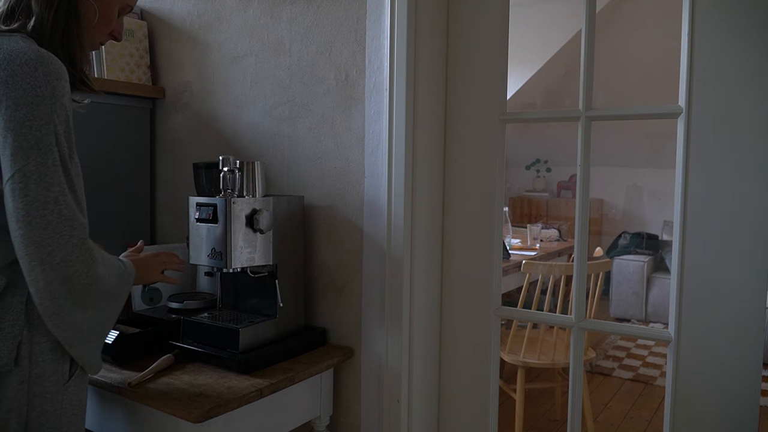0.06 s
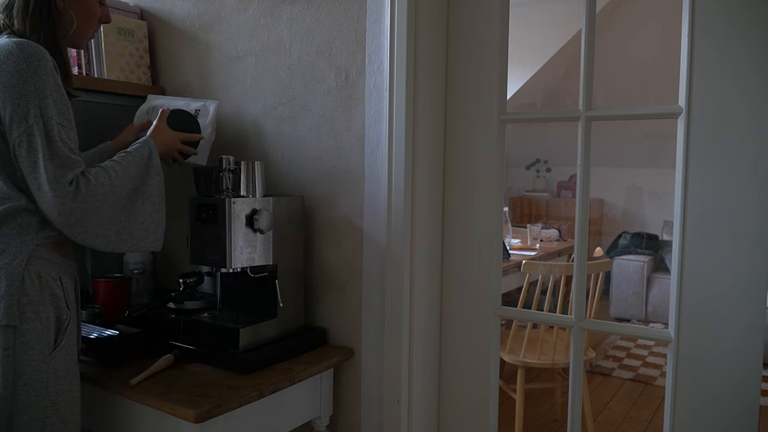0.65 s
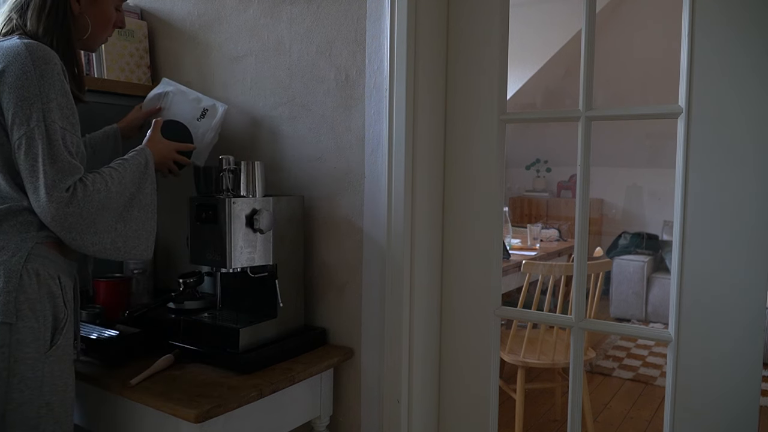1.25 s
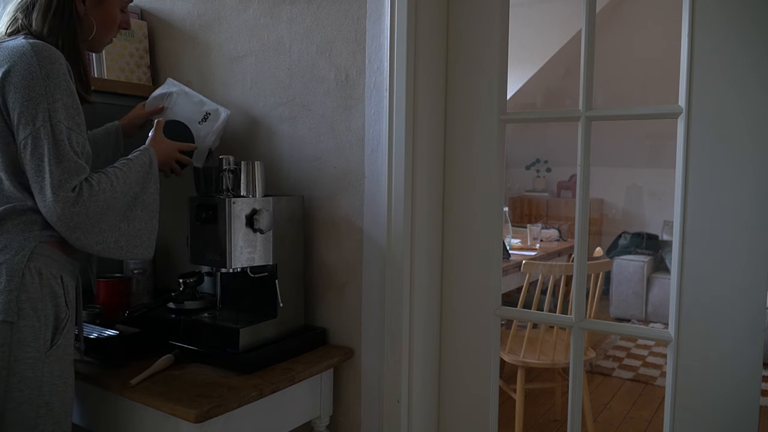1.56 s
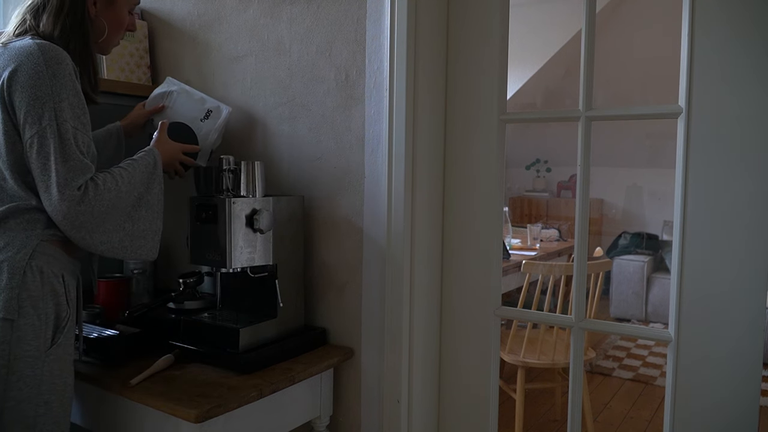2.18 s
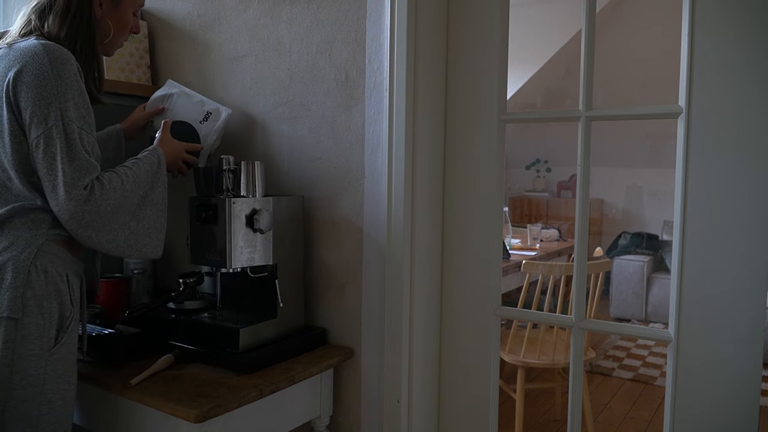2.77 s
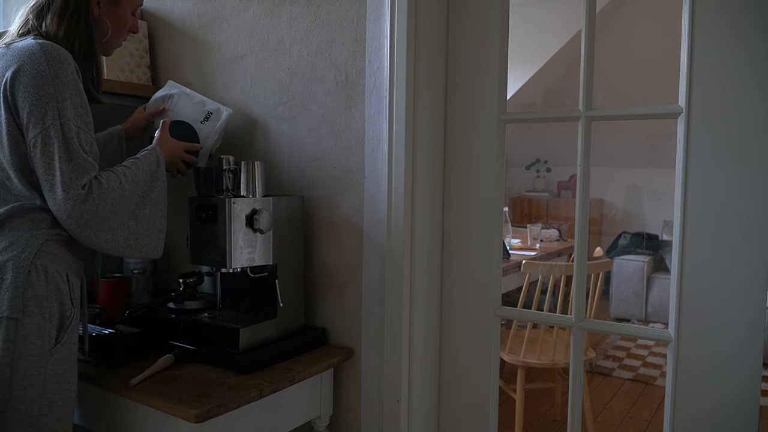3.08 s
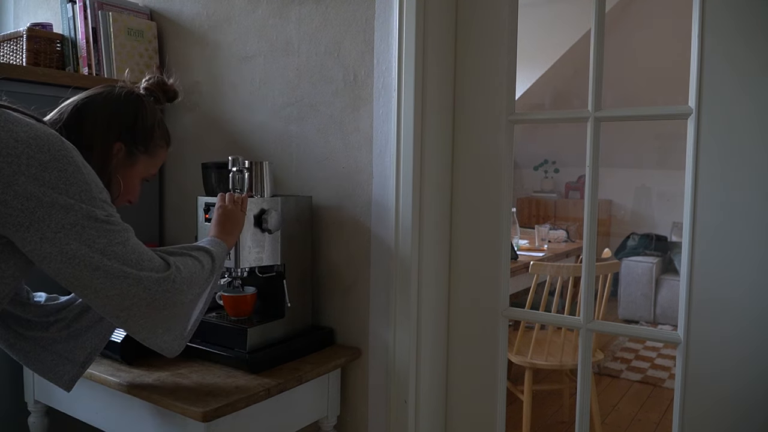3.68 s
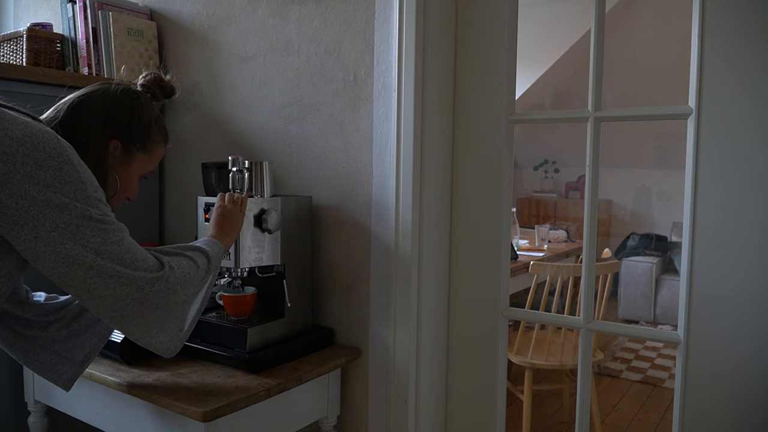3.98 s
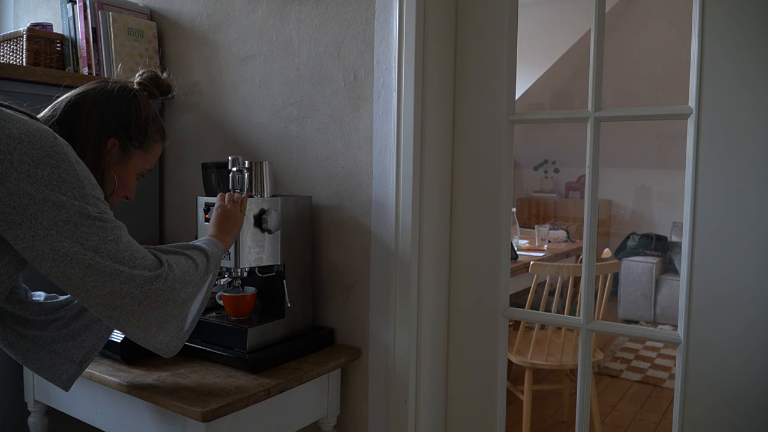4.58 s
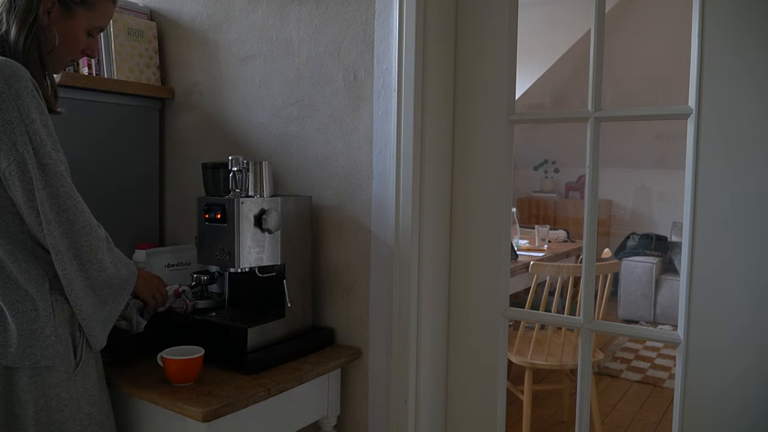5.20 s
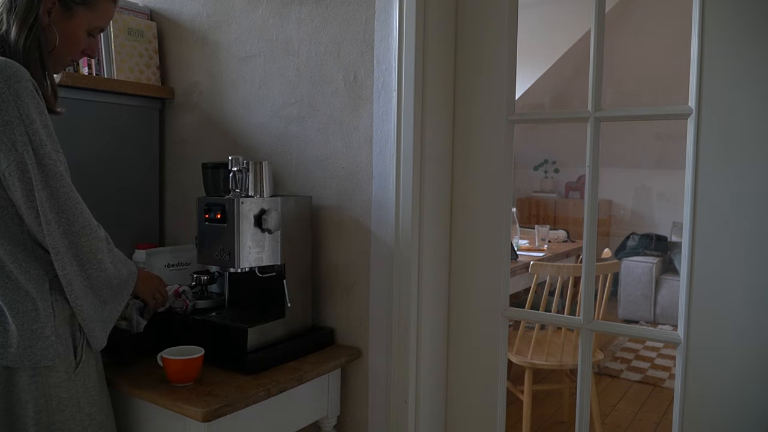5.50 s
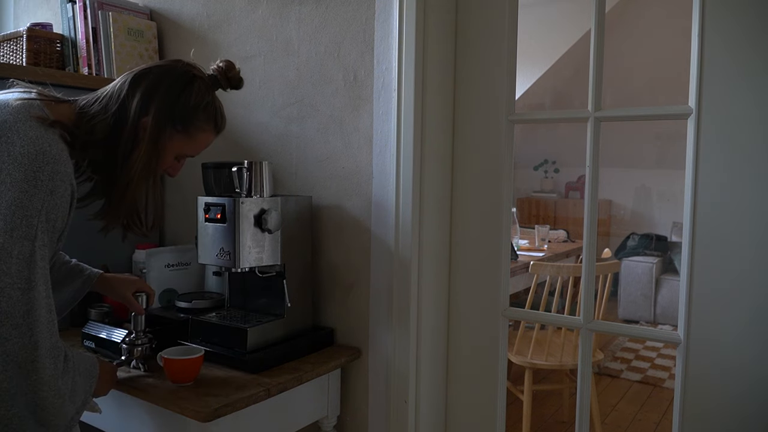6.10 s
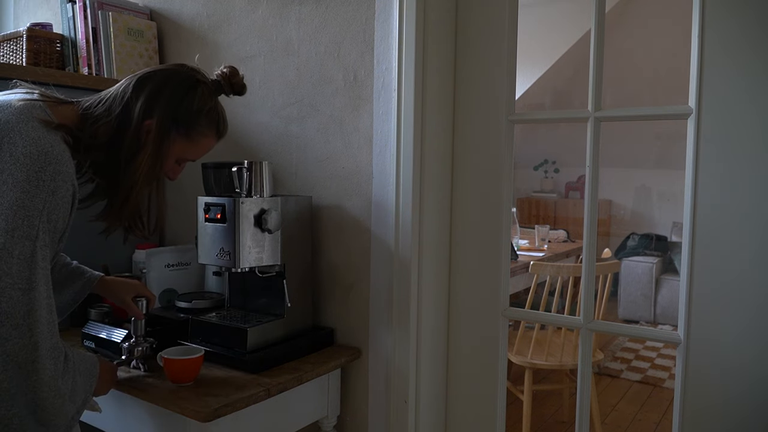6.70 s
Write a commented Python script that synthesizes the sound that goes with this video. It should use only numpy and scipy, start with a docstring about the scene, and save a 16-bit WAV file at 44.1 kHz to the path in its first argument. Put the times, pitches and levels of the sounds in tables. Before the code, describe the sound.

A paper bag crinkles and beans clatter into a hopper, followed by an espresso pump's buzzing hum and a short burst of grinding.

```python
"""A rattle of beans dies away in a ringing metal cup; a paper bag rustles and crinkles; beans pour, clicking on
each other and pinging off a plastic hopper. An espresso machine's piston pump hums at the mains rate, then its
grinder crushes beans with a loud rush and a gear whine until the scene changes. A faint metallic hiss and soft
knocks remain. Short scenes in a small kitchen, cut into one another."""
import sys
import numpy as np
from scipy import signal
from scipy.fft import rfft, irfft
from scipy.io import wavfile
from scipy.ndimage import uniform_filter1d

SR = 44100
rng = np.random.default_rng(int(sys.argv[2]) if len(sys.argv) > 2 else 0)


def transcribe(u):
    """Save the signal u as a 16-bit wav file named by the first command-line argument.

    u: samples, shape (n,) or (channels, n), limited to [-1, 1]; the rate is SR.
    q: integer samples, one column per channel.
    """
    v = np.clip(np.atleast_2d(u).T, -1, 1)
    q = np.round(v * 32767).astype(np.int16)
    wavfile.write(sys.argv[1], SR, q)


N = 302085
T = np.arange(N) / SR
HZ = np.fft.rfftfreq(8192, 1 / SR)
PUMP_ON_S, GRINDER_ON_S, GRINDER_OFF_S = 3.331, 4.793, 5.814

# dull spectrum of paper rustle and faint air: f/Hz, level/dB
RUSTLE_COLOUR = [(40, -44), (150, -33.5), (235, -15.5), (340, -14.5), (520, -2.5), (1100, 0.5), (1700, -2),
                 (4000, -8), (6000, -15), (16000, -22)]
# bright spectrum of crinkling paper and cracking shells: f/Hz, level/dB
CRACKLE_COLOUR = [(2000, -36.5), (4500, -2.5), (7000, 2), (10000, 2), (13000, 6), (16000, -1.5)]


def amp(db):
    """Decibels to gain."""
    return 10 ** (np.asarray(db) / 20)


def unit_rms(x):
    """Scale to rms 1."""
    return x / np.sqrt(np.mean(x ** 2) + 1e-20)


def log_interp(points, hz):
    """Interpolate a table over log frequency."""
    f, value = np.transpose(points)
    return np.interp(np.log(hz + 1), np.log(f + 1), value)


def gate(t, at_s, edge_s=.004):
    """Ramp from 0 to 1, centred on at_s."""
    return np.clip((t - at_s) / edge_s + .5, 0, 1)


def swell(age, rise_s, hold_s, fade_db_per_s):
    """Attack, hold, release."""
    return np.clip(age / rise_s, 0, 1) * amp(-fade_db_per_s * np.maximum(age - rise_s - hold_s, 0))


def span(start_s, end_s):
    """Sample times of one scene."""
    return T[round(start_s * SR):round(end_s * SR)]


def highpass(x, edge_hz):
    """Small light things radiate no bass."""
    return signal.sosfilt(signal.butter(4, edge_hz, "high", fs=SR, output="sos"), x)


def add(mix, at_s, sound):
    """Mix a sound in at at_s."""
    part = mix[max(round(at_s * SR), 0):][:len(sound)]
    part += sound[:len(part)]


def body(colour, peaks=()):
    """Minimum-phase impulse response of a smooth spectrum plus resonances."""
    power = amp(log_interp(colour, HZ)) ** 2
    for hz, width_hz, db in peaks:
        power = power + amp(db) ** 2 / (1 + ((HZ - hz) / width_hz) ** 2) ** 2
    log_gain = np.log(np.r_[power, power[-2:0:-1]] + 1e-12) / 2
    return np.fft.ifft(np.exp(np.conj(signal.hilbert(log_gain)))).real[:len(HZ)]


def excite(x, response):
    """Circular convolution, scaled to rms 1."""
    return unit_rms(irfft(rfft(x) * rfft(response, len(x)), len(x)))


def ring(modes, scatter_db=3, detune=0.0045):
    """Decaying modes; each blow lands on a new spot, so level and pitch scatter."""
    t = T[:SR // 6]
    sound = np.zeros(len(t))
    for hz, width_hz, db in modes:
        decay = amp(db + scatter_db * rng.normal()) * np.exp(-np.pi * width_hz * t)
        struck_hz = hz * (1 + detune * rng.normal())
        sound += decay * np.sin(2 * np.pi * (struck_hz * t + rng.random()))
    return sound


def grains(t, per_s, spread_db):
    """Random clicks: many small, a few large."""
    hit = rng.random(len(t)) < per_s / SR
    size = np.minimum(rng.exponential(1, len(t)), 4)
    return hit * rng.choice([-1, 1], len(t)) * amp(spread_db * size)


def wander(t, rate_hz):
    """Random drift of rms 1, low-passed at rate_hz."""
    coarse = t[::64]
    f = np.fft.rfftfreq(len(coarse), coarse[1] - coarse[0])
    spectrum = rfft(rng.standard_normal(len(coarse))) / (1 + (f / rate_hz) ** 2) ** 2
    return unit_rms(np.interp(t, coarse, irfft(spectrum, len(coarse))))


def reflections():
    """Sparse echoes of energy 1; the treble dies first."""
    # room decay: f/Hz, t60/s
    decay = [(200, 0.58), (2000, 0.49), (8000, 0.05), (16000, 0.04)]
    taps = rng.choice([-1, 1], SR // 4) * (rng.random(SR // 4) < .15)
    hz, s, bands = signal.stft(taps, SR, nperseg=256)
    tail = signal.istft(bands * amp(-60 * s / log_interp(decay, hz)[:, None]), SR, nperseg=256)[1]
    return tail / np.linalg.norm(tail)


def kitchen(t, x, wet_db, side_db, left_db):
    """Direct sound and room in the middle, echoes at the sides; all cut off with the scene."""
    # side-channel spectrum: f/Hz, level/dB
    width = [(50, -22), (180, -54), (350, -27), (700, -17), (1400, -14), (2800, -8.5), (6000, -2.5),
             (14000, 3)]
    echoes = signal.fftconvolve(x, reflections())[:len(t)]
    mid = (x + amp(wet_db) * echoes) / np.sqrt(1 + amp(wet_db) ** 2)
    spot = unit_rms(np.sin(2 * wander(t, 31.6)))  # each grain sounds from a slightly different place
    side_response = signal.fftconvolve(reflections(), body(width))
    side = amp(side_db) * signal.fftconvolve(x * spot, side_response)[:len(t)]
    cut = signal.windows.tukey(len(t), .002)
    out = np.zeros((2, N))
    for channel, sign in zip(out, (1, -1)):
        add(channel, t[0], (mid + sign * side) * amp(sign * left_db / 2) * cut)
    return out


def worktop_knocks(t):
    """Something is set down softly: dull, decaying bursts."""
    # knocks: t/s, level/dB, t60/s
    knocks = [(6.315, -54, 0.76), (6.332, -50.5, 0.24), (6.47, -61, 0.97)]
    # their spectrum: f/Hz, level/dB
    colour = [(40, -26), (110, -7), (220, -9), (295, 3), (400, -5), (800, 3), (1200, -14), (3000, -23),
              (4300, -8), (5500, -26), (12000, -40)]
    envelope = sum(amp(db - 60 * np.maximum(t - s, 0) / t60) * gate(t, s) for s, db, t60 in knocks)
    return envelope * excite(grains(t, per_s=2500, spread_db=3.0), body(colour))


def idle_machine():
    """The hot machine hisses and sings faintly behind the knocks."""
    # hiss spectrum: f/Hz, level/dB
    colour = [(30, -23), (110, -12.5), (350, -8), (750, -1.5), (1400, -3), (2100, -10.5), (3300, -9),
              (4800, -5.5), (5600, -8.5), (9000, -10.5), (16000, -21)]
    # thin tones: f/Hz, level/dB
    tones = [(592, -75), (3828, -69), (4841, -72), (4866, -69), (4915, -74), (5954, -80), (8646, -80)]
    t = span(GRINDER_OFF_S, N / SR)
    sound = amp(-55) * excite(rng.standard_normal(len(t)), body(colour))
    for hz, db in tones:
        tone = np.sin(2 * np.pi * hz * t + 0.67 * wander(t, 7.2))
        sound += amp(db + 1.0) * unit_rms(tone * (1 + 0.31 * wander(t, 10)))
    return kitchen(t, sound + worktop_knocks(t), wet_db=-17.0, side_db=3.0, left_db=2.0)


def paper_bag():
    """Each move gives a dull rustle and fine crinkles that fade sooner; a few creases snap."""
    # bag lifted, tipped, shaken: t/s, rise/s, hold/s, rustle level/dB, crinkle level/dB
    moves = [(0.383, 0.11, .17, -34.5, -40), (0.692, 0.023, 0.086, -39.5, -45),
             (0.916, 0.0097, 0.0076, -39, -46.5), (1.04, .02, .02, -44, -47),
             (1.137, .025, 0.13, -38.5, -45.5), (1.264, 0.023, 0.021, -36, -36.5),
             (1.356, .03, 0.15, -35.5, -36.5), (1.714, 0.02, .01, -44.5, -31),
             (1.823, .03, 0.069, -45, -48), (2.053, .025, 0.017, -45, -52), (2.278, 0.02, .03, -46.5, -48),
             (2.39, 0.024, 0.12, -48.5, -56), (2.613, 0.021, 0.04, -49.5, -54),
             (2.774, 0.02, .02, -51, -52.5), (3.072, 0.031, 0.02, -46.5, -54)]
    # snapping creases: t/s, level/dB
    creases = [(0.9313, -31), (1.043, -29.5), (1.1603, -33), (1.264, -27), (1.2945, -29), (1.4222, -16.5)]
    rustle_db_per_s, crinkle_db_per_s = 66, 125
    t = span(.38, PUMP_ON_S)
    slide, flex = np.zeros((2, len(t)))
    for s, rise_s, hold_s, rustle_db, crinkle_db in moves:
        slide = np.maximum(slide, amp(rustle_db) * swell(t - s, rise_s, hold_s, rustle_db_per_s))
        flex = np.maximum(flex, amp(crinkle_db) * swell(t - s, rise_s, hold_s, crinkle_db_per_s))
    slide *= amp(2.0 * wander(t, 14))
    rustle = slide * excite(grains(t, per_s=6000, spread_db=2.0), body(RUSTLE_COLOUR))
    flex *= amp(2.4 * wander(t, 14))
    crinkle = flex * excite(grains(t, per_s=21000, spread_db=3.5), body(CRACKLE_COLOUR))
    age = T[:SR // 40]
    for s, db in creases:
        burst = rng.standard_normal(len(age)) * np.exp(-age / 0.0032)
        snap = signal.fftconvolve(burst, body(CRACKLE_COLOUR))
        add(crinkle, s - t[0], amp(db + 0.5) * snap / abs(snap).max())
    return kitchen(t, rustle + crinkle, wet_db=-11.5, side_db=-0.5, left_db=1.8)


def settling_beans():
    """A dense rattle dies away; the metal cup's ring takes a growing share."""
    # envelope: t/s, level/dB
    fade = [(0.0, -19.5), (0.088, -26), (0.38, -63)]
    # rattle spectrum: f/Hz, level/dB
    colour = [(60, -53), (330, -33.5), (600, -13), (730, -3), (930, -12), (2900, -8), (3550, -0.5),
              (4100, -1.5), (5700, 0), (10000, -9), (16000, -31)]
    # cup modes: f/Hz, level/dB, time to fall 25 dB/s
    modes = [(730, -27, .42), (3480, -8, .4), (3560, -5, .4), (3660, -5, .25), (4690, -7, .4),
             (4770, -6, .42), (5600, -5, .35), (5760, -4, .33)]
    t = span(0, .42)
    level_db = np.interp(t, *np.transpose(fade)) + 1.5
    rattle = excite(grains(t, per_s=7000, spread_db=1.5), body(colour))
    cup = unit_rms(sum(amp(db - 25 * t / fall_s) * np.sin(2 * np.pi * hz * t + 1.9 * wander(t, 71))
                       for hz, db, fall_s in modes))
    cup /= np.sqrt(uniform_filter1d(cup ** 2, size=2000))  # flattened: level_db sets the decay
    cup_share = np.clip(.09 + t * .9, 0, .8)
    sound = amp(level_db) * (np.sqrt(1 - cup_share) * rattle + np.sqrt(cup_share) * cup)
    air = amp(-58.5) * excite(rng.standard_normal(len(t)), body(RUSTLE_COLOUR))
    return kitchen(t, sound + air, wet_db=-9.5, side_db=-0.5, left_db=1.2)


def hard_bean(wall_modes, ping_modes, ping_db, boom_db):
    """One bean hits the hopper: a crack and a high ping; the wall swings up more slowly and booms."""
    age = T[:SR // 6]
    burst = rng.standard_normal(len(age)) * np.exp(-age / 0.00093)
    crack = signal.fftconvolve(burst, body(CRACKLE_COLOUR))[:len(age)]
    strike = ring(ping_modes, scatter_db=3.5, detune=0.012) + amp(3.0) * crack
    ping = highpass(strike * (1 - np.exp(-age / 0.00044)), 3300)
    boom = highpass(ring(wall_modes) * (1 - np.exp(-age / 0.0019)), 1360)
    return amp(ping_db) * ping / abs(ping).max() + amp(boom_db) * boom / abs(boom).max()


def pouring_beans():
    """Gushes of beans click on each other and strike the hopper, which booms and pings."""
    # gushes from the bag: t/s, hold/s, level/dB, fade/(dB/s)
    gushes = [(1.534, 0.015, -22.5, 140), (1.614, .24, -24.5, 4), (2.409, .42, -24.5, 38)]
    # bean-on-bean spectrum: f/Hz, level/dB
    colour = [(200, -65), (1250, -30), (1750, 2), (2300, -9), (2850, 0), (3700, 2), (4800, -0.5),
              (7000, 0.5), (9500, -3.5), (13500, -8.5), (16000, -17.5)]
    # low hopper modes: f/Hz, width/Hz, level/dB
    wall_modes = [(1777, 126, -5), (1920, 64, 0), (2027, 39, -11), (2654, 55, -8.5), (2910, 59, -5.5)]
    # high hopper modes: f/Hz, width/Hz, level/dB
    ping_modes = [(6060, 100, -14), (6400, 80, -7.5), (8080, 115, 2.5), (8620, 67, -6.5), (10100, 400, -24)]
    # hardest hits: t/s, ping level/dB, boom level/dB
    hits = [(1.5483, -18, -38), (1.5678, -23, -41), (1.6327, -17, -19.5), (1.6847, -9, -43),
            (1.802, -8, -27), (1.9895, -12, -23), (2.0645, -12, -32), (2.0966, -18, -20.5),
            (2.143, -8, -21), (2.1839, -8.5, -22), (2.207, -13, -27), (2.3067, -11.5, -31),
            (2.3246, -8.5, -25), (2.5347, -9, -30), (2.5701, -7.5, -25), (2.7571, -22, -28),
            (2.7917, -11, -26), (2.8389, -10, -25), (2.8853, -10, -31), (2.923, -10, -39),
            (2.9773, -10.5, -21), (3.1688, -6.5, -32), (3.2281, -13.5, -22), (3.294, -9, -29),
            (3.3108, -7.5, -29)]
    rise_s, trickle_db = 0.013, -30
    t = span(1.546, PUMP_ON_S)
    surge = np.max([amp(db) * swell(t - s, rise_s, hold, fade) for s, hold, db, fade in gushes], axis=0)
    flow = np.maximum(surge, amp(trickle_db)) * amp(1.56 * wander(t, 40))  # beans fall in clumps
    clatter = amp(-2.5) * excite(grains(t, per_s=5000, spread_db=3.0), body(colour))
    booms = sum(excite(grains(t, per_s=110, spread_db=3.5), highpass(ring(wall_modes), 1640))
                for spot in range(4))
    pings = sum(excite(grains(t, per_s=45, spread_db=2.5), highpass(ring(ping_modes, detune=.005), 4500))
                for spot in range(8))
    pings_db = -11.5 + 8 * gate(t, 2.52, edge_s=0.084)  # more hard bounces late in the pour
    hopper = amp(-10.5) * unit_rms(booms) + amp(pings_db) * unit_rms(pings)
    shell_ticks = amp(-10.0) * excite(grains(t, per_s=380, spread_db=2.5), body(CRACKLE_COLOUR))
    sound = flow * (clatter + shell_ticks + gate(t, 1.63) * hopper)
    for s, ping_db, boom_db in hits:
        add(sound, s - t[0], hard_bean(wall_modes, ping_modes, ping_db - 1.5, boom_db + 4.5))
    return kitchen(t, sound, wet_db=-9, side_db=-1.8, left_db=2.0)


def pump():
    """A mains-driven piston: clean hum, a buzz alike at each stroke, and a throbbing rattle."""
    # envelope of buzz and rattle: t/s, level/dB
    envelope = [(3.35, -33), (4.464, -30.5), (4.77, -33)]
    # hum: mains harmonic number, level/dB
    harmonics = [(1, -45), (2, -27), (3, -23), (4, -13), (5, -8), (6, -9), (7, -3.5), (8, -0.5), (9, -0.5),
                 (10, -4.5), (11, -7.5), (12, -21), (13, -6.5), (14, -14)]
    # spectrum of buzz and rattle: f/Hz, level/dB
    colour = [(30, -47), (130, -25), (200, -22), (370, -2), (600, -6), (900, -2), (1300, -4.5), (1850, 2),
              (2300, -3), (2900, -2), (4000, -10), (6000, -9.5), (9000, -7.5), (16000, -15.5)]
    # casing resonances: f/Hz, width/Hz, level/dB
    casing = [(363, 36, 2), (797, 17, 4), (1457, 7.8, 3), (1650, 27, 5), (1840, 37, 8.5), (2053, 36, 3.5)]
    mains_hz = 49.97
    t = span(PUMP_ON_S, GRINDER_ON_S)
    level_db = np.interp(t, *np.transpose(envelope)) - 0.1
    strokes = mains_hz * t + 0.0062 * wander(t, 4)
    pipe_hz = np.interp(t, [4.0, 4.4], [455, 365])  # pipe resonance sinks as pressure builds
    hum = np.zeros(len(t))
    for k, db in harmonics:
        pipe_db = 4 * np.exp(-((k * mains_hz - pipe_hz) / 35) ** 2)
        hum += amp(db + pipe_db + wander(t, 2.8)) * np.cos(2 * np.pi * (k * strokes + rng.random()))
    throb = 1 + 0.18 * np.cos(2 * np.pi * strokes)
    one_stroke = rng.standard_normal(round(SR / mains_hz))
    buzz = unit_rms(highpass(np.resize(one_stroke, len(t)), 670))
    rattle = unit_rms(grains(t, per_s=9000, spread_db=2.0)) * amp(wander(t, 14))
    drive = (amp(-3) * buzz + rattle) * throb
    sound = amp(level_db) * excite(drive, body(colour, casing)) + amp(-40.5) * unit_rms(hum)
    return kitchen(t, sound, wet_db=-21.5, side_db=-0.7, left_db=1.3)


def gear_motion(t):
    """Whine phase in cycles and load (0-1): the burrs spin free, then bite; speed sags and jitters."""
    # free runs: t/s, free f/Hz, loaded f/Hz, sag time constant/s
    runs = [(4.77, 1852, 1718, .045), (5.191, 1827, 1670, .2)]
    free_s, spin_up_s = .085, 0.028
    whine_hz, load = np.zeros((2, len(t)))
    for s, free_hz, loaded_hz, sag_s in runs:
        bite = 1 - np.exp(-np.maximum(t - s - free_s, 0) / sag_s)
        takeover = gate(t, s, edge_s=spin_up_s)
        whine_hz += takeover * (free_hz + (loaded_hz - free_hz) * bite - whine_hz)
        load += takeover * (bite - load)
    jitter = (0.0021 + 0.0091 * load) * wander(t, 39)
    return np.cumsum(whine_hz * (1 + jitter)) / SR, load


def grinder():
    """Burrs crush beans in a ringing housing; the motor drones; the gear whine weakens under load."""
    # crushing spectrum: f/Hz, level/dB
    colour = [(30, -53), (130, -33.5), (290, -13), (410, -4.5), (700, -6.5), (1000, -2.5), (1350, -9),
              (1780, -4), (2150, -9), (2900, -12), (3650, -8.5), (4200, -12.5), (5200, -12), (6800, -21),
              (8000, -18), (15000, -39)]
    # housing resonances: f/Hz, width/Hz, level/dB
    housing = [(191, 12.5, -11.5), (240, 5.8, -9), (401, 21, -5), (463, 14, -2), (567, 17, -3),
               (622, 19, 1.5), (855, 12, -5), (974, 14, -1), (1067, 13, -3), (1212, 30, -5), (1590, 17, -9)]
    gear_teeth, motor_hz = 41, 619
    t = span(GRINDER_ON_S, GRINDER_OFF_S)
    cycles, load = gear_motion(t)
    once_per_turn = 1 + 0.031 * np.cos(2 * np.pi * cycles / gear_teeth)
    bites = grains(t, per_s=7000, spread_db=1.5) * once_per_turn * amp(0.76 * wander(t, 20))
    crush = amp(-23.5) * excite(bites, body(colour, housing))
    cracks = amp(-46.0) * excite(grains(t, per_s=140, spread_db=2.0), body(CRACKLE_COLOUR))
    mesh = np.sin(2 * np.pi * cycles) + amp(-14) * np.sin(4 * np.pi * cycles)
    whine = amp(-29 - 7.5 * load) * unit_rms(mesh * (1 + .3 * wander(t, 60)))
    motor = np.sin(2 * np.pi * motor_hz * t + .6 * wander(t, 13))
    drone = amp(-36.5) * unit_rms(motor * (1 + .32 * wander(t, 23)))
    return kitchen(t, crush + cracks + whine + drone, wet_db=-13, side_db=-0.7, left_db=1.5)


def scene():
    """The steps of making coffee, in time order."""
    return settling_beans() + paper_bag() + pouring_beans() + pump() + grinder() + idle_machine()


def record(dry):
    """Low-pass at 15.9 kHz."""
    lowpass = signal.firwin(511, 15900, window=("kaiser", 9), fs=SR)
    return signal.oaconvolve(dry, lowpass[None], "same")


dry = scene()
out = record(dry)
transcribe(out)
```